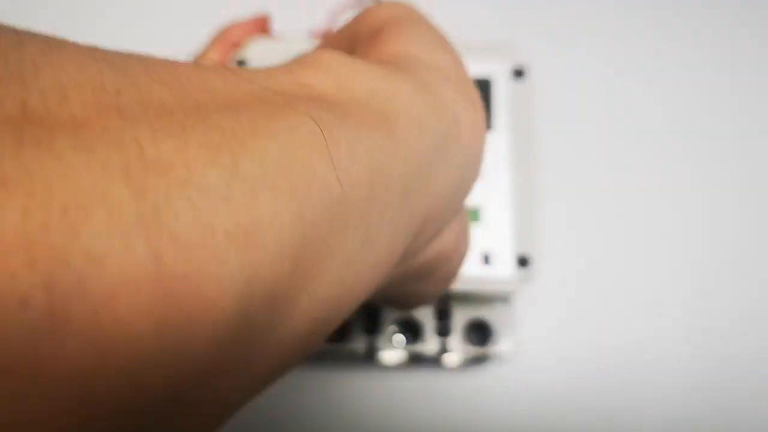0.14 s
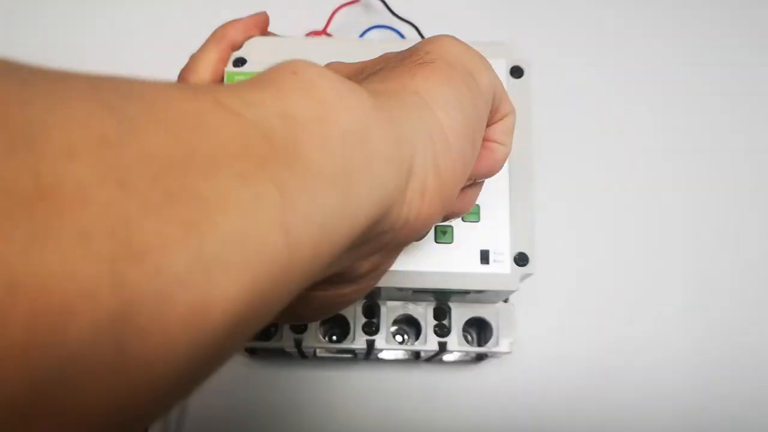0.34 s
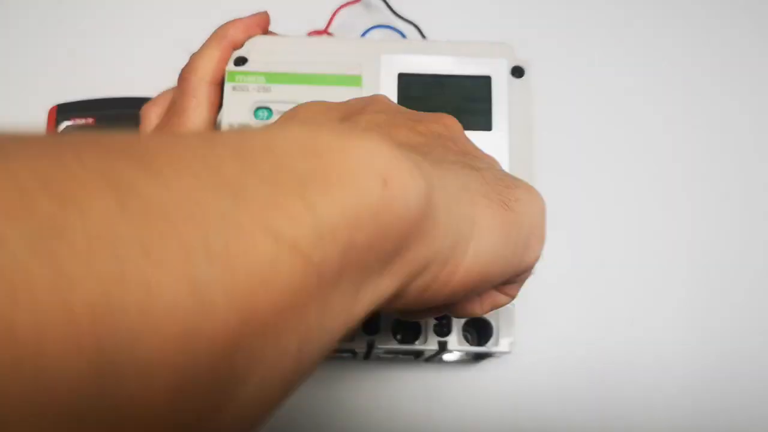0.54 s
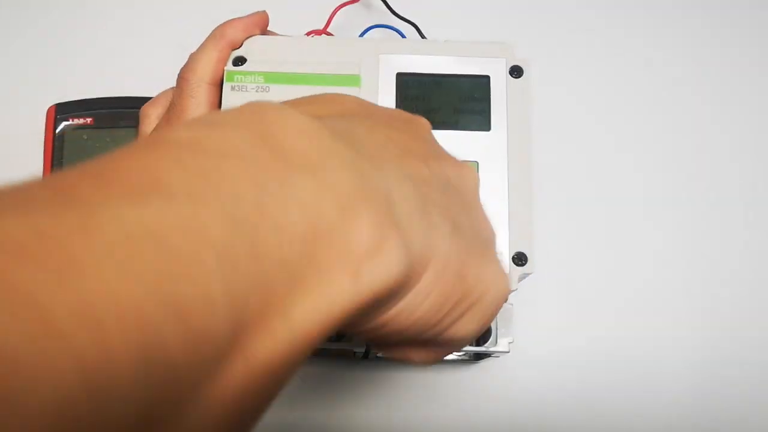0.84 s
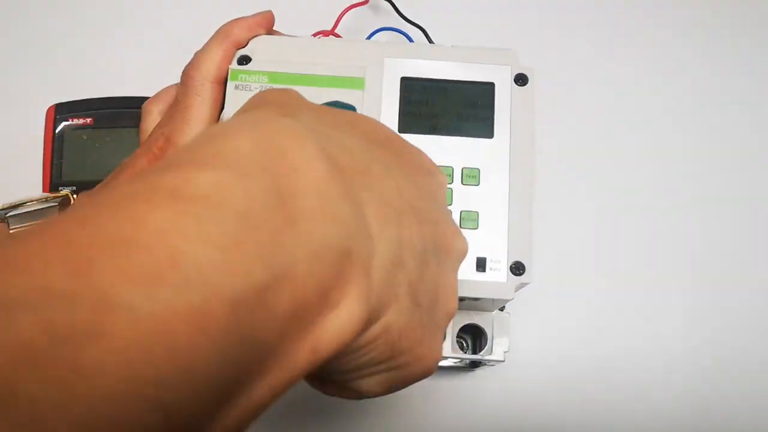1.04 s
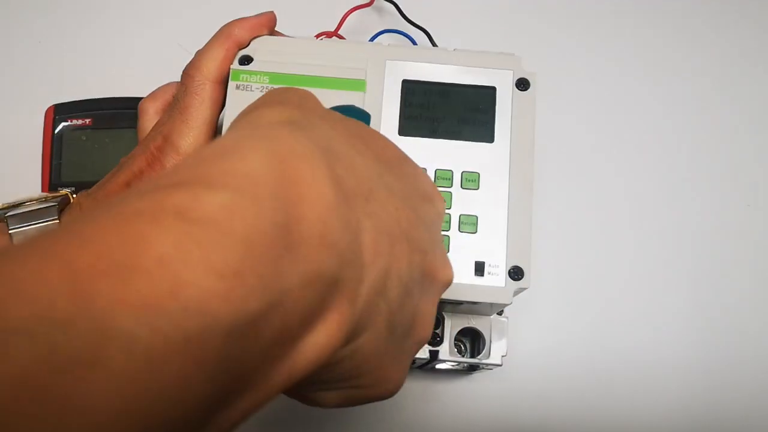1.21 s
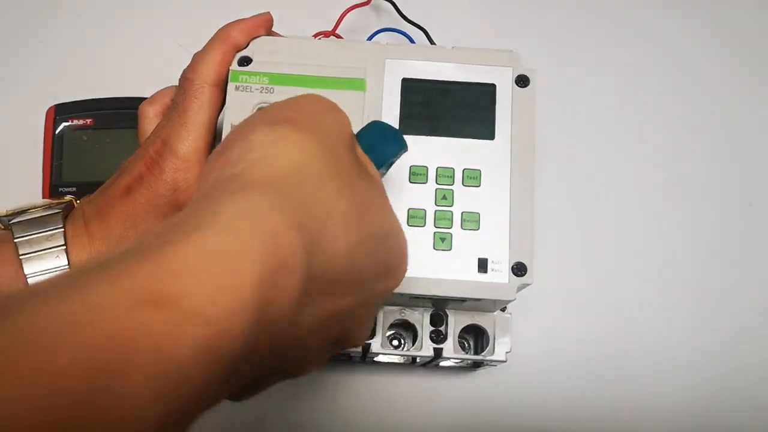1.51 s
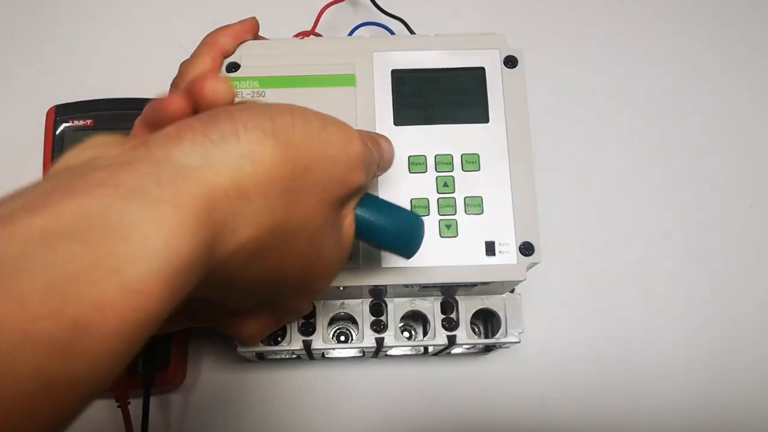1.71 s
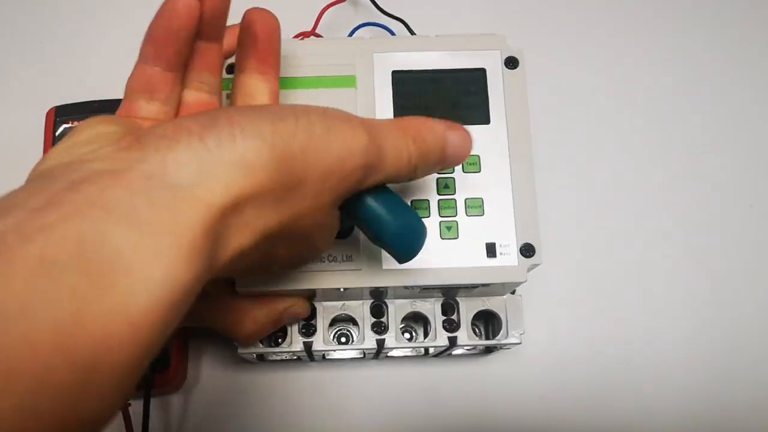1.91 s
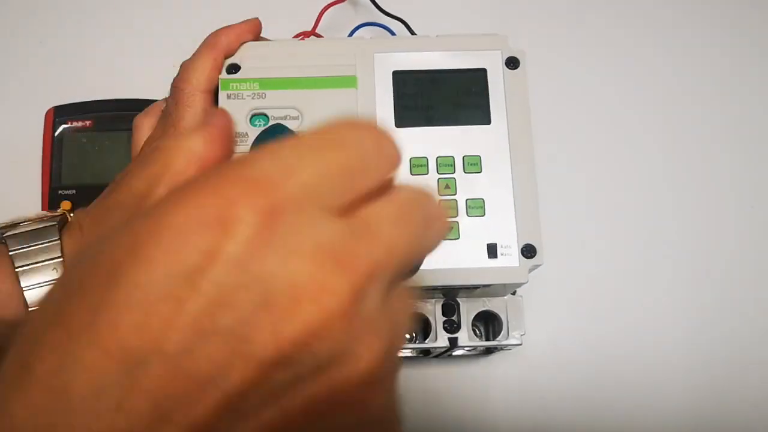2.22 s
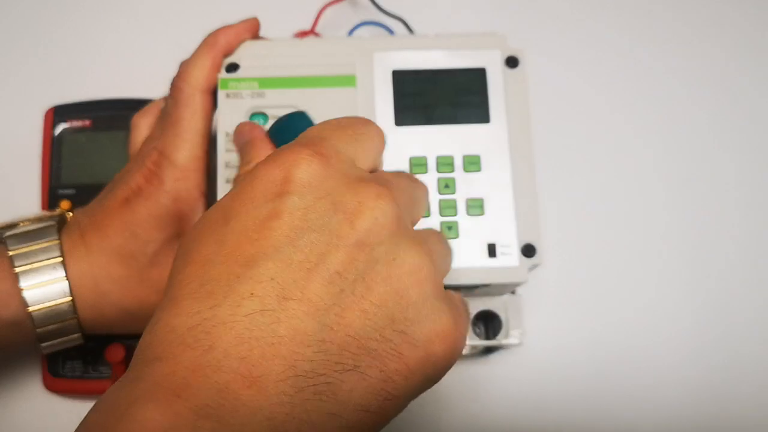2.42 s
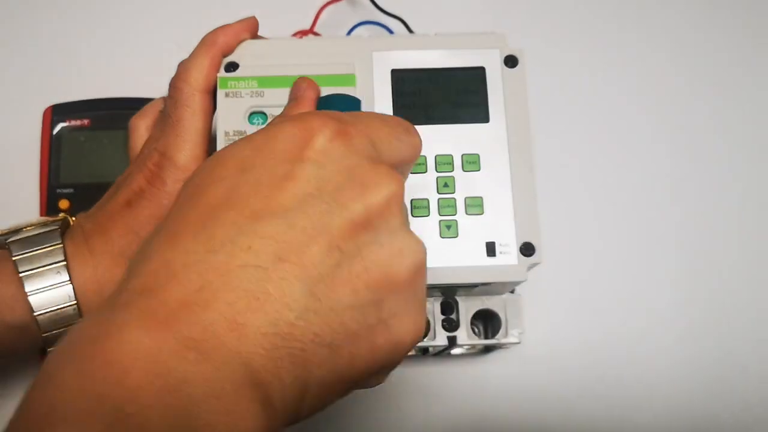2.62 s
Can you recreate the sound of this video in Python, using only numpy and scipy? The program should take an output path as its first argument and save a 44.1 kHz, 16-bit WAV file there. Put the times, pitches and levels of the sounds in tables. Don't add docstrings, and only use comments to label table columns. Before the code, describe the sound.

Close-up sharp clacks of a spring-loaded breaker, plastic case and steel ringing with a short room tail; quieter latch clicks between and after, faint bench thumps, and recorder gain dipping after the loudest blows.

```python
import sys
import numpy as np
from scipy import signal
from scipy.fft import rfft, irfft, next_fast_len
from scipy.io import wavfile

SR = 44100
rng = np.random.default_rng(int(sys.argv[2]) if len(sys.argv) > 2 else 0)


def boost(x):
    u = np.asarray(x, float) / 20
    return 10 ** u


def to_wav(s):
    ch = np.atleast_2d(s).T
    pcm = np.round(np.clip(ch, -1, 1) * 32767)
    wavfile.write(sys.argv[1], SR, pcm.astype(np.int16))


N = 121275


def along(points, hz):
    point_hz, value = np.transpose(points)
    return np.interp(np.log(hz + 1), np.log(point_hz + 1), value)


def filtered(x, response):
    size = next_fast_len(x.shape[-1] + 8192)
    spectrum = rfft(x, size) * response(np.fft.rfftfreq(size, 1 / SR))
    return irfft(spectrum, size)[..., :x.shape[-1]]


def resonance(f, hz, width, db):
    return boost(db) * 1j * f * width / (hz * hz - f * f + 1j * f * width)


def body(peaks):
    return lambda f: sum((-1) ** k * resonance(f, *peak) for k, peak in enumerate(peaks))


def power(peaks, f):
    return sum(np.abs(resonance(f, *peak)) ** 2 for peak in peaks)


def peak1(x):
    return x / (np.abs(x).max() + 1e-12)


# pitch_hz, likeness [0 to 1]
PORT_LIKENESS = [(60, 1), (200, .95), (400, 1), (900, 0.2), (3000, 0.13), (8000, 0.067)]


def port_angle(hz):
    return np.arccos(np.clip(along(PORT_LIKENESS, hz), -1, 1)) / 2


def diffuse(n):
    def share(hz):
        return np.array([np.cos(port_angle(hz)), np.sin(port_angle(hz))])
    mid, side = filtered(rng.standard_normal((2, n)), share)
    return np.array([mid + side, mid - side])


# start_s, depth_db, recovery_s
GAIN_DUCKS = [
    (.2375, 34, .318),
    (.556, 10, .15),
    (1.7365, 21, .32),
]


def duck_db(t):
    total = 0
    for start, depth, recovery in GAIN_DUCKS:
        attack = np.clip((t - start) / .001, 0, 1)
        total = total + depth * np.clip(1 - (t - start) / recovery, 0, 1) * attack
    return total


# pitch_hz, level_db [per Hz]
AIR_SPECTRUM = [(15, -9), (25, -7), (200, -10), (277, -25), (591, -32.5), (1330, -22.5), (1440, -22.5),
                (4610, -37.5), (16000, -62.5)]


def air():
    quiet = filtered(diffuse(N), lambda hz: boost(along(AIR_SPECTRUM, hz)))
    hiss = filtered(rng.standard_normal((2, N)), lambda hz: hz > 9000)
    return boost(-59) * quiet / quiet.std() + boost(-75) * hiss


# pitch_hz, level_db
TAIL_COLOUR = [(60, 6.5), (200, -1.5), (600, 5), (1200, 6.5), (2100, 5), (3300, 3), (9500, 0.5), (15000, 9)]
# pitch_hz, t60_s
TAIL_DECAY = [(60, .6), (130, .72), (400, .55), (1500, .52), (4000, .49), (9000, .43), (14000, .33)]
# pitch_hz, level_db, t60_s
STANDING_WAVES = [(61.3, -2.5, .7), (97.7, 6, 0.35), (120.6, 1, 0.67), (143.5, 2.5, 0.55),
                  (181.9, 1.5, 0.45), (227.8, -1, 0.55), (274.8, -2.5, 0.57)]


def room(n):
    hz, t, z = signal.stft(rng.standard_normal((2, n)), SR, nperseg=256)
    angle = port_angle(hz)[:, None]
    z = np.cos(angle) * z[0] + np.sin(angle) * np.array([z[1], -z[1]])
    decay_db = along(TAIL_COLOUR, hz)[:, None] - 60 * t / along(TAIL_DECAY, hz)[:, None]
    tail = signal.istft(z * boost(decay_db), SR, nperseg=256)[1][:, :n]
    t = np.arange(n) / SR
    delay_s, rise_s = .003, .009
    tail = tail * np.clip((t - delay_s) / rise_s, 0, 1)
    count = len(STANDING_WAVES)
    phases = rng.uniform(0, 2 * np.pi, (count, 1, 1)) + rng.normal(0, 0.081, (count, 2, 1))
    hum = 0
    for (f, db, t60), phase in zip(STANDING_WAVES, phases):
        hum = hum + boost(db - 60 * t / t60) * np.sin(2 * np.pi * f * t + phase)
    return tail / np.linalg.norm(tail[0]) + boost(-48.5) * hum * np.clip(t / 0.033, 0, 1)


# start_s [centre], level_db, length_s
BENCH_PUSHES = [
    (.097, -45, .028),
    (1.415, -56, .008),
    (1.46, -56, .03),
    (2.712, -48, .015),
    (2.6, -51, .09),
]
# start_s [centre], level_db, length_s
CASE_RUBS = [
    (.175, -61.5, .03),
    (1.733, -23, 0.0049),
    (2.72, -62, .03),
]
# pitch_hz, width_hz, level_db
CASE_PEAKS = [(1065, 900, -8), (1950, 830, 4.5), (2830, 1200, -10.5)]


def swells(rows):
    t = np.arange(N) / SR
    return sum(boost(db + duck_db(s)) * np.exp(-((t - s) / length) ** 2) for s, db, length in rows)


def hand():
    lean = body([(50, 90, 0), (150, 160, -5)])
    low = filtered(rng.standard_normal(N), lambda f: lean(f) ** 2)
    rub = filtered(diffuse(N), body(CASE_PEAKS + [(5000, 1300, -28.5)]))
    return swells(BENCH_PUSHES) * low / low.std() + swells(CASE_RUBS) * rub / rub.std()


# pitch_hz, width_hz, level_db
STEEL_PEAKS = [(3900, 1200, 1), (5380, 1200, -0.5), (7240, 820, 1.5), (8370, 1200, -3.5),
               (12200, 1700, -8.5)]
# pitch_hz, width_hz, level_db
BENCH_PEAKS = [(70.3, 8.3, -8), (138, 110, 3), (243, 23.3, 10), (334, 40, 11), (582.6, 900, 0.5)]


def blow(ring_hz, steel_db, thump_db, spread_s, case_db, room_db, tail_s):
    t = np.arange(SR // 16) / SR
    u = t / spread_s
    flurry = u * np.exp(-2 * u ** 0.68) * rng.standard_normal(len(t))
    flurry = flurry * np.exp(.5 * rng.standard_normal(len(t)))
    steel_flurry = flurry * rng.choice([1, 1, 1, -1], (2, len(t)))
    push = u * np.exp(-3 * u)

    near = body([(ring_hz, ring_hz / 4, 0)])
    case = [(hz, width, db + case_db) for hz, width, db in CASE_PEAKS]
    direct = [peak1(filtered(flurry, lambda f: near(f) ** 2 + body(case)(f))),
              boost(steel_db) * peak1(filtered(steel_flurry, body(STEEL_PEAKS))),
              boost(thump_db) * peak1(filtered(push, body(BENCH_PEAKS)))]

    grid = np.arange(0, SR / 2, 10)
    spectra = [np.abs(near(grid)) ** 3 + power(case, grid), power(STEEL_PEAKS, grid), power(BENCH_PEAKS, grid)]
    radiated = np.sqrt(sum(np.sum(d ** 2) * p / p.mean() for d, p in zip(direct, spectra)))
    out = boost(room_db) * filtered(room(round(tail_s * SR)), lambda f: np.interp(f, grid, radiated))
    out[:, :len(t)] += sum(direct)
    return out


# start_s, level_db [peak], pitch_hz [case ring], steel_db, thump_db
SPRING_SNAPS = [
    (.2385, -1, 1750, -2, -23),
    (.5575, -3.5, 1950, -5, -11.5),
    (.568, -19.5, 2042, -1.5, -5.5),
    (.571, -5.5, 2100, -6.5, -15),
    (1.7265, -19.5, 1450, -45, -8),
    (1.7375, -4, 2654, -3.5, -10.5),
    (1.7405, -5, 1944, -4, -12),
    (1.7555, -9.5, 2000, -34, -30),
]
# start_s, level_db [peak], pitch_hz [case ring], steel_db, thump_db
LATCH_TICKS = [(.0012, -42, 2460, -2, -16.5), (.155, -68.5, 1200, 12, -25), (.2122, -33, 2795, 12, -14.5),
               (1.0038, -34, 1480, -22, -7), (1.006, -37.5, 3900, 2.5, -19), (1.1908, -36, 3250, -18, -46),
               (1.1915, -39, 1210, -24, -25.5), (1.191, -35.5, 5000, -22, -16.5),
               (1.4225, -19.5, 2370, -0.5, -51), (1.4226, -23, 3130, -14.5, -28.5),
               (1.4845, -17, 2445, -3, -30.5), (1.4895, -24.5, 1820, -16.5, -15),
               (1.5175, -54.5, 2200, -28.5, 16), (1.6375, -13, 1224, -0.5, -29.5),
               (1.638, -15.5, 2690, -3, -37), (2.4345, -43, 1223, -14, -20),
               (2.4416, -17.5, 2450, -34, -32), (2.442, -19.5, 1157, 2.5, -39),
               (2.4545, -23.5, 2160, -3, -12.5), (2.459, -21.5, 1900, -33, -13),
               (2.4655, -20, 1800, -19, -44), (2.472, -33, 1700, -1, -36), (2.4775, -21.5, 1850, 4, -15),
               (2.7095, -34.5, 2430, -8, -8.5)]


def breaker():
    out = np.zeros((2, N + SR))
    snap = dict(spread_s=0.0024, case_db=-5, room_db=-7, tail_s=1)
    tick = dict(spread_s=.0009, case_db=-15, room_db=-1, tail_s=.6)
    for rows, kind in ((SPRING_SNAPS, snap), (LATCH_TICKS, tick)):
        for s, db, ring_hz, steel_db, thump_db in rows:
            level = boost(db + duck_db(s + kind["spread_s"]))
            sound = level * blow(ring_hz, steel_db, thump_db, **kind)
            out[:, round(s * SR):][:, :sound.shape[1]] += sound
    return out[:, :N]


def scene():
    return breaker() + hand() + air()


def top_cut(x):
    return signal.sosfilt(signal.butter(12, 16480, fs=SR, output="sos"), x)


# pitch_hz, level_db
MICROPHONE_CURVE = [(9600, 0), (10400, -10), (15300, -21.5), (15900, -18), (17000, -57)]
# pitch_hz, level_db [left over right]
PORT_BALANCE = [(300, -.5), (700, 1), (1400, -5), (3000, -6), (5000, -1), (9000, -1), (13000, -7)]


def record(dry):
    def ports(hz):
        colour_db = along(MICROPHONE_CURVE, hz) + np.outer([.5, -.5], along(PORT_BALANCE, hz))
        lead = np.pi * hz * 0.0007206 * hz / (hz + 218)
        return boost(colour_db) * np.exp(np.outer([1j, -1j], lead))
    ducked = dry * boost(-duck_db(np.arange(N) / SR))
    heard = filtered(ducked, ports)
    return top_cut(np.clip(heard, -1, 1))


dry = scene()
out = record(dry)
to_wav(out)
```